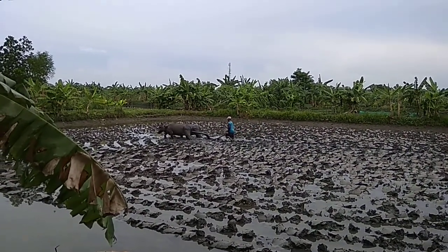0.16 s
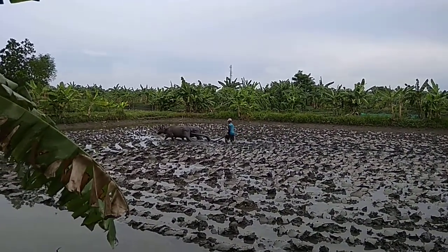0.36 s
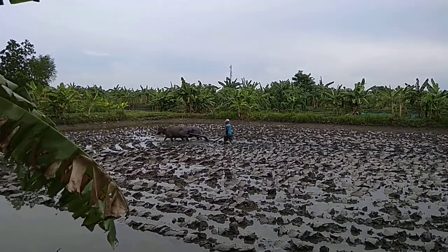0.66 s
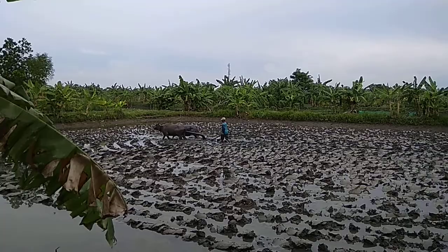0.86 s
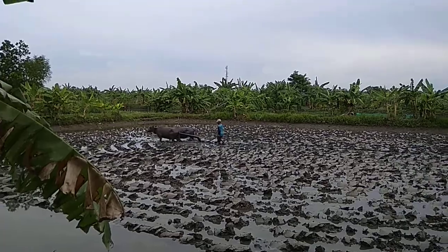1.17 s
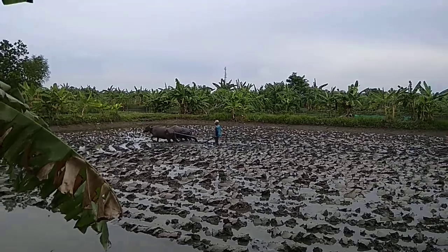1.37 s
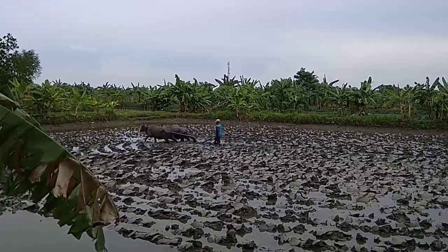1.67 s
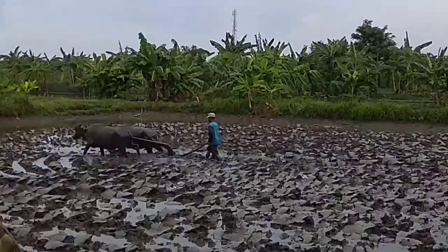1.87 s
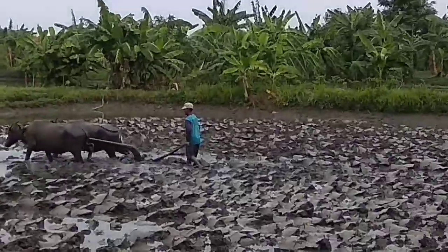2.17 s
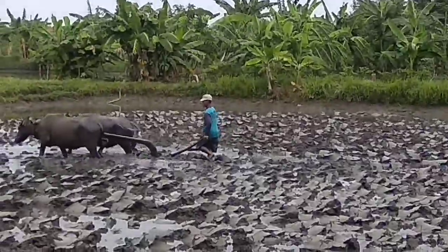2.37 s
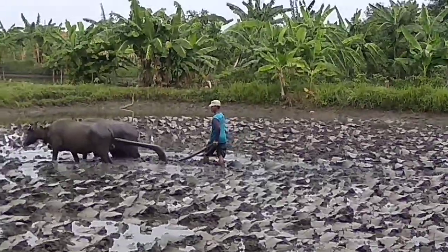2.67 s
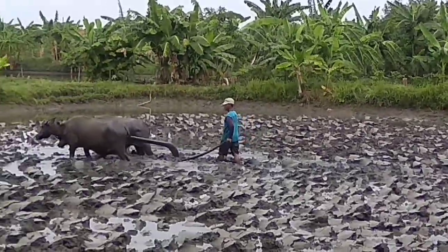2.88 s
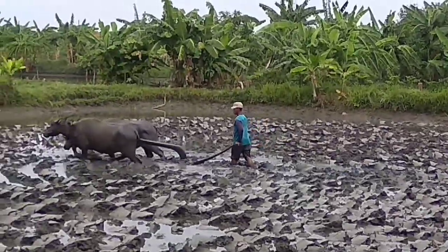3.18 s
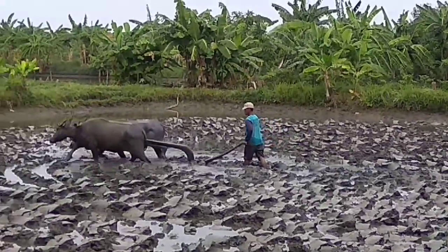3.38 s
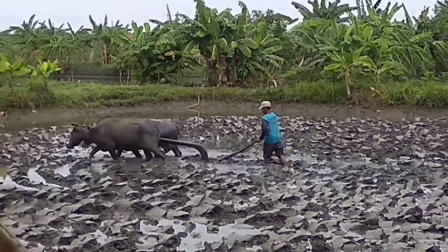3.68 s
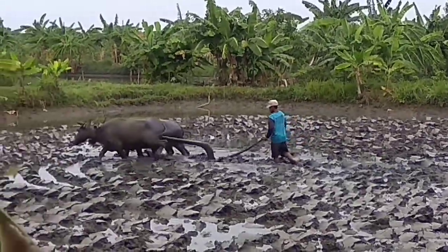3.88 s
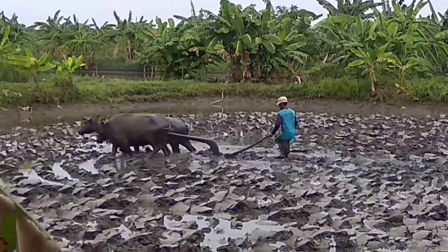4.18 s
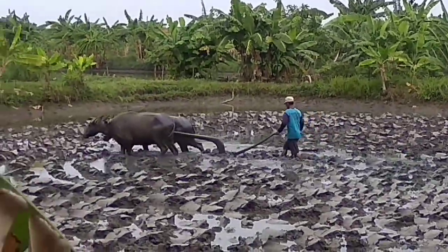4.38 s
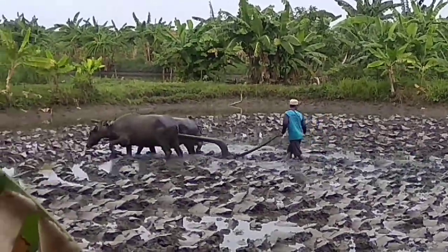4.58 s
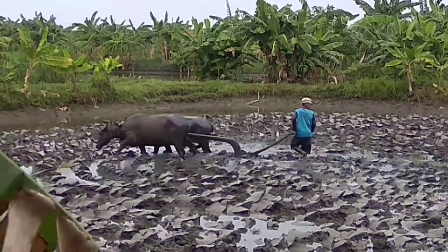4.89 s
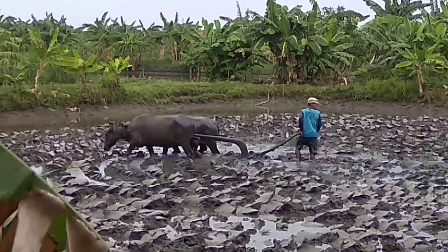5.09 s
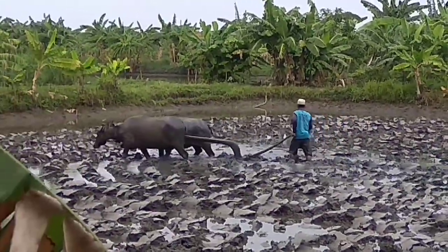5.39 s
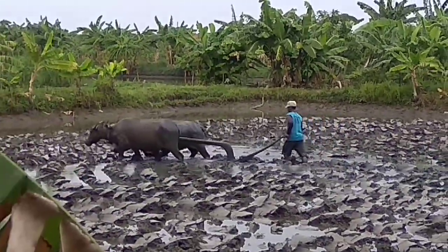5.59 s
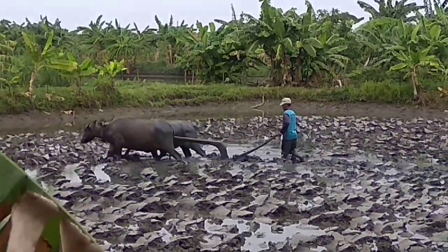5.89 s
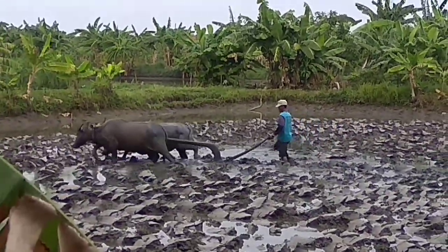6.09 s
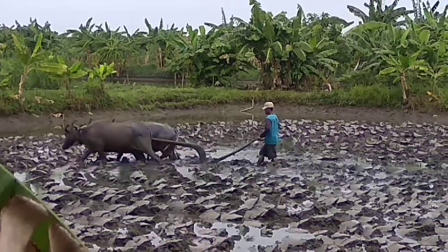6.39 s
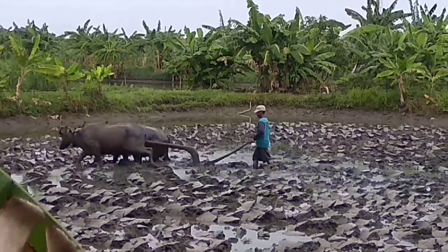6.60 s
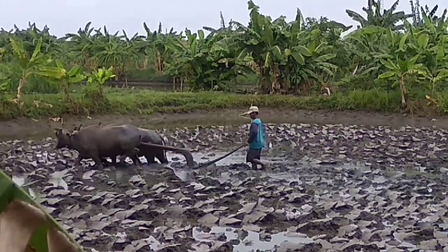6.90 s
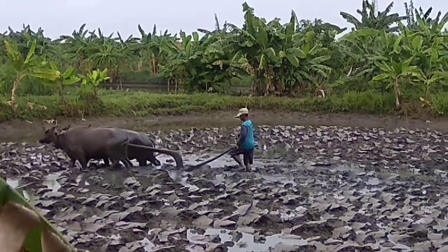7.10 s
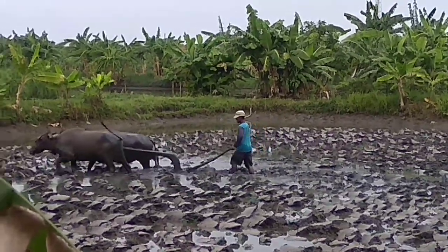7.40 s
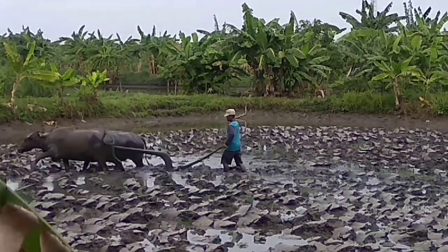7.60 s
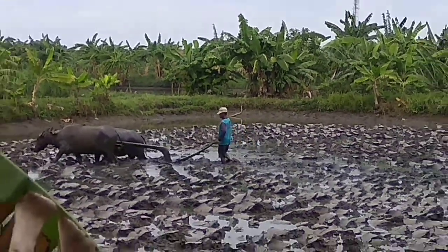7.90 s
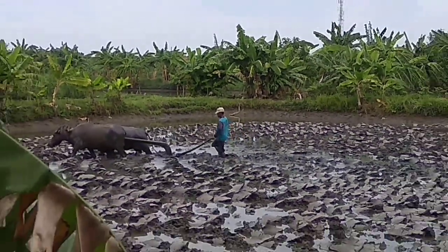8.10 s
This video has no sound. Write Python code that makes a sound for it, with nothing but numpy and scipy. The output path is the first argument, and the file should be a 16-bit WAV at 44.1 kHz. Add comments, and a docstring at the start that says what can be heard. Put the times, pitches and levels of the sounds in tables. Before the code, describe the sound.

Open countryside heard through a phone, slightly muffled, with the low sound leaning left. From 0 s a small single-cylinder motorbike putters, revs rising, over road rumble, dry rattle, high hiss and faint insects; a soft high rustle comes at 0.3 s. At 0.5 s a nearer bike enters with slow separate thumps that quicken into a throaty, barking buzz by 1.2 s. The first bike's pitch drops sharply at 2.1 to 2.5 s in a gear change, then climbs again. The near exhaust is strongest around 2.5 s, with valve ticks and a short echo. From 3 to 6 s its pitch keeps rising while everything recedes. At about 6.2 s revs fall and rattle and hiss collapse. From 6.5 to 8.2 s only dull, distant puttering remains, with small scattered rustles, clearest near 7.4 s and at the very end, and thin insect hiss.

```python
"""Two single-cylinder motorbikes pull away along a country road to the left of a phone, change gear and fade.
One bike is heard from the start, with road rattle, hiss and faint insects; the nearer one joins at half a second.
Each firing thumps, rings and barks through the exhaust pipe, with an echo and valve ticks on top.
After about six seconds the revs fall; the noise-made treble also fades, leaving a few short rustles and thin
insect hiss."""
import sys
import numpy as np
from scipy import signal
from scipy.fft import rfft, irfft, next_fast_len
from scipy.io import wavfile
from scipy.ndimage import uniform_filter1d

SR = 44100
rng = np.random.default_rng(int(sys.argv[2]) if len(sys.argv) > 2 else 0)


def output_pcm(signal):
    """Save a mono or channel-first signal as 16-bit PCM at the path in sys.argv[1].

    Samples are clipped to [-1, 1] before scaling.
    """
    pcm = np.clip(np.atleast_2d(signal).T, -1, 1) * 32767
    wavfile.write(sys.argv[1], SR, np.round(pcm).astype(np.int16))


N = 363808  # length in samples


def undb(db):
    """Turns a level in dB into a plain gain."""
    return 10 ** (np.asarray(db) / 20)


def unit(x):
    """Scales a sound to an average (rms) level of 1."""
    return x / np.sqrt(np.mean(x ** 2))


def curves(table):
    """Joins the rows of a table with straight lines: every column after the time, one value a sample."""
    s, *columns = np.transpose(table)
    return [np.interp(np.arange(N) / SR, s, c) for c in columns]


def on_log(table, hz):
    """Reads a (pitch_hz, value) table with pitch spaced in octaves, as the ear hears it."""
    pitch_hz, values = np.transpose(table)
    return np.interp(np.log(np.maximum(hz, 1)), np.log(pitch_hz), values)


def shape(x, db_of_hz):
    """Colours a sound by a gain in dB for each frequency."""
    size = next_fast_len(N + SR // 10)
    gain = undb(db_of_hz(np.fft.rfftfreq(size, 1 / SR)))
    return irfft(rfft(x, size) * gain, size)[..., :N]


def resonance(x, hz, width):
    """Lets one pitch ring through, like a hollow body: a two-pole band-pass with gain 1 at its centre."""
    return signal.lfilter(*signal.iirpeak(hz, hz / width, fs=SR), x)


def walk(rate):
    """Wanders smoothly between random levels, rate of them a second; spread near 1."""
    k = int(SR / rate)
    steps = np.repeat(rng.standard_normal(N // k + 1), k)
    return 1.3 * uniform_filter1d(uniform_filter1d(steps, k), k)[:N]


def noise(spectrum, alike, flicker_db, flicker_rate):
    """Noise in half-octave bands, each flickering alone; alike = how much left and right share."""
    out = 0
    low_hz, high_hz = spectrum[0][0], spectrum[-1][0]
    for hz in low_hz * 2 ** np.arange(0, np.log2(high_hz / low_hz), .5):
        mid, side = (resonance(rng.standard_normal(N), hz, hz / 2) for _ in range(2))
        mid_share, side_share = np.sqrt((1 + np.array([alike, -alike])) / (2 * hz))
        band = mid_share * mid + side_share * side * np.array([[1], [-1]])
        out = out + undb(flicker_db * walk(flicker_rate)) * band
    # the bands are equally strong per octave; the second term makes them equal per Hz
    return unit(shape(out, lambda hz: on_log(spectrum, hz) + 10 * np.log10(np.maximum(hz, 1))))


JITTER, SCATTER_DB = .007, 1.0  # random spread of firing time (share of a cycle) and strength
WANDER_TURNS, WANDER_DB = .025, 1.5  # slow drift of firing time (cycles) and strength, times each bike's wander
DRIFT_DB, DRIFT_SHARE = 2.0, .02  # each resonance drifts alone in strength and pitch
FAINT_DB, FAINT_SCATTER = -46, 0.3  # below this level moving air makes firings more uneven, by this share per dB
RING_T60_S = 0.085  # time for the long ring to fall by 60 dB
OVERRUN_SAG, OVERRUN_FALL_PER_S2 = 0.24, 30  # the ring sags by this share when the firing rate falls this fast
PUMP_DB_PER_OCTAVE = 17.5  # piston pumping grows with revs
CYCLE_DB, CYCLE_DB_PER_OCTAVE = -15.5, 22  # tone at the firing rate against the pumping; extra growth with revs
PARTNER_DB = -8.5  # lower partner of the bark, against the bark


def bike(rate, table, pipe, long_ring, start, pump_db, pump_turn, wander):
    """Each firing rings the pipe, which sounds higher as the gas heats with revs; the piston pumps twice a cycle."""
    hz, = curves(rate)
    octaves = np.log2(hz / 35)
    ring_db, thump_db, bark_db, third_db = curves(table)
    ring_db = ring_db + (wander * WANDER_DB + np.clip(FAINT_DB - ring_db, 0, 5) / 2) * walk(6.3)
    bark_db = ring_db + bark_db
    levels_db = ring_db, ring_db + thump_db, bark_db, ring_db + third_db, bark_db + PARTNER_DB

    # with the throttle shut the revs fall and the gas cools
    fall = -uniform_filter1d(np.gradient(hz) * SR, size=SR // 10)
    overrun = np.clip(fall / OVERRUN_FALL_PER_S2, 0, 1) ** 2
    ring_hz = long_ring[0] * (hz / 35) ** long_ring[1] * (1 - OVERRUN_SAG * overrun)

    # the engine fires each time the count of turns passes a whole number
    turns = start + np.cumsum(hz) / SR + wander * WANDER_TURNS * walk(5)
    at = np.flatnonzero(np.diff(np.floor(turns)))
    at = at[at > table[0][0] * SR]
    chance = rng.standard_normal((400, 7))
    t, rise_s = np.arange(6144) / SR, .003
    swell = np.sin(np.pi / 2 * np.minimum(t / rise_s, 1)) ** 2
    drift = [(undb(DRIFT_DB * walk(6)), 1 + DRIFT_SHARE * walk(8)) for _ in levels_db]
    sound = np.zeros(N + len(t))
    for i, (late, shared, *own) in zip(at, chance):
        uneven = 1 + FAINT_SCATTER * np.clip(FAINT_DB - ring_db[i], 0, 6)
        first = max(i + int(JITTER * uneven * late * SR / hz[i]), 0)
        period = int(SR / hz[i])
        modes = [(ring_hz[i], RING_T60_S)] + [(f * (hz[i] / 35) ** rise, t60) for f, t60, rise in pipe]
        for (f, t60), db, mine, (gain, tune) in zip(modes, levels_db, own, drift):
            # all resonances crest together at the top of the pressure rise
            ring = swell * np.cos(2 * np.pi * f * tune[i] * (t - rise_s)) * undb(-60 * t / t60)
            # rings of earlier firings overlap within one cycle; together they make the rms level
            cycle = np.bincount(np.arange(len(t)) % period, ring)
            strength = undb(db[i] + SCATTER_DB * uneven * (shared + mine)) * gain[i]
            sound[first:first + len(t)] += strength / np.std(cycle) * ring

    twice = np.sin(4 * np.pi * (turns + pump_turn))
    once = undb(CYCLE_DB + CYCLE_DB_PER_OCTAVE * octaves) * np.sin(2 * np.pi * turns)
    pump_gain = np.sqrt(2) * undb(ring_db + pump_db + PUMP_DB_PER_OCTAVE * octaves)
    pumping = pump_gain * (twice + once) * (np.arange(N) > at[0])
    return sound[:N] + pumping, at


# how fast the far engine fires: (start_s, firings_per_s)
FAR_FIRING_RATE = [(0.0, 34.8), (1.0, 38.77), (2.0, 41.83), (2.15, 38.04), (2.5, 28.35), (2.8, 28.07),
                   (4.5, 33.96), (5.6, 36.57), (6.0, 35.75), (6.45, 30.06), (6.8, 29.14), (7.3, 30.41),
                   (8.25, 31.9)]
# loudness of its exhaust: (start_s, ring level_db, thump_db, bark_db and rasp_db, these three against the ring)
FAR_LEVELS = [(0, -27.5, -27, -27, -31), (.35, -33, -25, -25, -25), (.8, -37.5, -3.5, -11.5, -33),
              (1.6, -60, 20, 13, -18), (2.4, -39.5, -1, -4, -9), (3.1, -37, -14, 4, -4),
              (3.8, -40.5, 2.5, 2.5, -8), (4.6, -43.5, 3, -6.5, -19), (5.6, -44.5, 2, -27, -16),
              (6.6, -58, 4, -31, -10), (7.4, -52.5, -0.5, -9.5, -30), (8.25, -71, -6, -19, -31)]
# its pipe, in rows thump, bark, rasp, lower partner of the bark:
# (pitch_hz at 35 firings per s, fall by 60 dB_s, rise with revs as a power)
FAR_RESONANCES = [(111, 0.026, 0.23), (341, 0.07, 0.26), (585, 0.0016, 0.1), (264, 0.037, 0.5)]
# long ring of its pipe: (pitch_hz at 35 firings per s, rise with revs as a power)
FAR_LONG_RING = (153, 0.056)


def far_bike():
    """The far single-cylinder engine, its firings ringing a pipe with a short thump and a rasp."""
    return bike(FAR_FIRING_RATE, FAR_LEVELS, FAR_RESONANCES, FAR_LONG_RING,
                start=.82, pump_db=-15.5, pump_turn=0.013, wander=0.98)


# loudness of the road's treble: (start_s, rattle_db, bright rattle_db, hiss_db)
ROAD_LEVELS = [(0, -44, -51, -53.5), (.2, -46, -60, -53.5), (.6, -47, -56.5, -53.5), (1.2, -46, -53.5, -49),
               (1.6, -43.5, -51, -50.5), (2.1, -43.5, -53.5, -52), (2.7, -43, -55.5, -47.5),
               (3.1, -43, -64, -48.5), (3.9, -45, -64, -49.5), (4.5, -46.5, -62, -52.5),
               (5.3, -48, -68.5, -57.5), (6.2, -53, -62, -62.5), (6.35, -62.5, -82, -63),
               (6.5, -80, -80, -61), (6.75, -85, -79, -71.5), (6.95, -87, -89, -72.5),
               (7.3, -94, -102, -76.5), (7.5, -92, -100, -84.5), (8.25, -92, -100, -88)]
# loudness of the low rumble: (start_s, level_db)
RUMBLE_LEVEL = [(0, -41), (.6, -41), (1.2, -38), (1.9, -38.5), (3.1, -38.5), (3.9, -38.5), (4.5, -40.5),
                (6.2, -46.5), (6.5, -50), (6.95, -48.5), (7.5, -49.5), (8.25, -50)]
# loudness of the upper rumble: (start_s, level_db, depth of its lumps_db, where below 0 means none)
UPPER_RUMBLE_LEVEL = [(0, -52, -0.5), (.6, -54.5, 21.5), (1.5, -42.5, -6), (3.1, -47.5, 7), (4.5, -45, -13),
                      (6.2, -54, 13), (6.5, -59, 7), (7.1, -59.5, 3), (7.6, -68, 5), (8.0, -75, 3.5),
                      (8.25, -57.5, 5.5)]
# colours of the noises, relative: (pitch_hz, level_db per Hz)
RUMBLE_COLOUR = [(20, -21), (40, -7), (70, -3), (110, -6), (200, -7), (370, -7), (450, -16), (560, -34),
                 (700, -60)]
UPPER_RUMBLE_COLOUR = [(380, -20), (480, 3.5), (620, -2), (780, -9.5), (900, -25), (1300, -70)]
RATTLE_COLOUR = [(420, -27), (620, -0.5), (900, -3.5), (1300, -7.5), (1700, -6), (2500, -13), (4000, -18),
                 (5500, -25.5), (7000, -54)]
HISS_COLOUR = [(3000, -5), (4500, 0), (5800, -3.5), (7500, 0), (10300, 1.5), (12500, -0.5), (14500, -6),
               (15700, -26)]


def road(at):
    """Low rumble of tyres and echoes, the rattle of running gear, and a high hiss, all made of noise."""
    rattle_db, bright_db, hiss_db = curves(ROAD_LEVELS)
    upper_db, lump_db = curves(UPPER_RUMBLE_LEVEL)
    low_db, = curves(RUMBLE_LEVEL)
    low_db = low_db + np.clip(FAINT_DB - low_db, 0, 3) * walk(9)  # lumpier when faint
    rumble = undb(low_db) * noise(RUMBLE_COLOUR, .85, flicker_db=2.5, flicker_rate=11)
    upper = noise(UPPER_RUMBLE_COLOUR, 0.19, flicker_db=0.0, flicker_rate=16)
    upper = undb(upper_db + np.clip(lump_db, 0, 6) * walk(14)) * upper

    # the rattle swells by 1.8 dB once a cycle, as the valve shuts
    cycle = np.interp(np.arange(N), at, np.arange(len(at)))
    throb = undb(-1.8 * np.cos(2 * np.pi * cycle))
    rattle = throb * noise(RATTLE_COLOUR, 0, flicker_db=1.5, flicker_rate=18)
    bright = rng.standard_normal((2, N))
    for _ in range(3):
        bright = resonance(bright, hz=2550, width=2100)
    bright = undb(bright_db + 2.0 * walk(22.12)) * unit(bright)
    hiss = undb(.9 * walk(35) + .3 * walk(5)) * noise(HISS_COLOUR, 0, flicker_db=1.3, flicker_rate=22)
    return rumble + upper + undb(rattle_db) * rattle + bright + undb(hiss_db) * hiss


# insect-like bands: (pitch_hz, width_hz of each filter pass, level_db at the start, fade_db per s)
INSECT_BANDS = [(10600, 920, -61.5, 2.5), (6660, 1400, -56.5, 9), (13200, 2500, -78, 2.5)]


def insects():
    """Narrow high bands of hiss that waver and fade, made by filtering noise twice."""
    out = 0
    for hz, width, db, fade_db in INSECT_BANDS:
        band = resonance(resonance(rng.standard_normal((2, N)), hz, width), hz, width)
        out = out + unit(band) * undb(db - fade_db * np.arange(N) / SR + 3 * walk(14))
    return out


# each part of a rustle, levels before its swell; rows at nearly one time sound as one burst:
# (start_s, length_s, body level_db, body pitch_hz, width_hz of each filter pass, treble level_db,
# left minus right_db)
RUSTLE_PARTS = [(0.291, 0.15, -52.5, 6500, 1200, -51, -2), (2.687, .05, -53, 4400, 1200, -62, 0),
                (6.302, 0.04, -47, 631, 60, -75, 8), (6.377, 0.045, -62, 1390, 700, -52, -1),
                (6.505, 0.088, -67.5, 1890, 600, -64, -4), (6.544, 0.043, -63, 1210, 400, -72, 4),
                (6.763, 0.054, -75, 690, 200, -60, -10), (6.768, 0.38, -75, 5900, 2200, -93, 14),
                (6.872, 0.044, -65.5, 1230, 250, -56, -3), (7.035, 0.053, -68, 1090, 300, -85, 4),
                (7.065, 0.078, -77.5, 1970, 500, -64.5, -11), (7.06, .1, -70, 5800, 1200, -90, 8),
                (7.23, 0.08, -81, 1250, 150, -64, -7), (7.363, 0.04, -57.5, 1220, 350, -58.5, 2.5),
                (7.363, 0.039, -60, 1760, 400, -90, 7), (7.365, 0.047, -65.5, 4260, 1000, -90, 0),
                (7.348, 0.035, -67, 870, 80, -90, 12), (7.36, .04, -74, 3100, 300, -90, 1),
                (7.41, 0.049, -75, 1500, 900, -67, 0), (7.543, 0.044, -76, 1290, 400, -63, -4),
                (7.538, .05, -78, 3200, 600, -90, -7), (7.618, .06, -85, 1290, 500, -67, -3),
                (7.797, .04, -84, 2820, 500, -87, 1), (7.78, .03, -78, 1040, 200, -90, 6),
                (7.792, 0.056, -78, 790, 100, -60.5, -3), (7.977, 0.051, -70, 1230, 300, -60, 1),
                (8.045, 0.064, -53, 550, 200, -90, 4), (8.115, 0.036, -60, 680, 200, -90, 4)]
# colour of the treble they share, relative: (pitch_hz, level_db per Hz)
RUSTLE_TREBLE_COLOUR = [(2500, -14), (4000, -3), (5800, -15), (7500, -8), (10300, 7), (12500, -5),
                        (14500, -2), (15700, -18)]


def rustles():
    """Short bursts of noise with a sharp start: each part has a body of its own pitch and a common treble."""
    high = noise(RUSTLE_TREBLE_COLOUR, 0, flicker_db=3.5, flicker_rate=16)
    flicker = undb(2.0 * walk(50))
    out, t = np.zeros((2, N + SR)), np.arange(SR) / SR
    soft = 1 - np.exp(-(t / .02) ** 2)  # the treble swells more slowly than the body
    for s, length_s, db, hz, width, treble_db, pan_db in RUSTLE_PARTS:
        body = rng.standard_normal((2, len(t)))
        for _ in range(3):
            body = resonance(body, hz, width)
        swell = (1 - np.exp(-t / 0.004)) * np.exp(-(t / max(length_s, .01)) ** 1.2)
        first = int(s * SR)
        treble = soft * high[:, first // 2:first // 2 + len(t)]
        mix = undb(db) * unit(body) + undb(treble_db) * treble
        pan = undb(np.array([[pan_db], [-pan_db]]) / 2)
        out[:, first:first + len(t)] += swell * pan * mix
    return out[:, :N] * flicker


# how fast the near engine fires: (start_s, firings_per_s)
NEAR_FIRING_RATE = [(.5, 14.47), (.62, 16.93), (1.1, 31.7), (1.25, 32.9), (1.45, 31.78), (1.7, 34.28),
                    (2.1, 34.79), (2.36, 32.82), (2.55, 33.33), (3.4, 37.05), (4.5, 41.85), (6.1, 48.12),
                    (6.25, 48.0), (6.45, 41.6), (6.8, 33.1), (7.03, 37.49), (7.27, 35.08), (8.25, 36.3)]
# loudness of its exhaust: (start_s, ring level_db, thump_db, bark_db and boom_db, these three against the ring)
NEAR_LEVELS = [(.5, -33, -21, -10.5, -4.5), (.8, -33.5, -6, -6, -11.5), (1.3, -32, -9, -4.5, -8.5),
               (1.42, -36.5, -8, 1, -1), (1.52, -30.5, -20, -3.5, -5.5), (1.9, -32.5, -18, -2, -1),
               (2.1, -34, -5, 1, -3), (2.35, -34, -5, 2, -5), (2.47, -27, -27, -3.5, -20),
               (2.8, -29.5, -17, -4.5, -17), (3.0, -35.5, -7, 2, -1), (3.5, -34, -5, 0.5, -25),
               (4.1, -37.5, -5, -1.5, 4), (4.5, -38, 2, 1.5, -22), (5.1, -40, -11, -3.5, -6),
               (6.2, -42.5, -4, -7.5, -16), (6.33, -47.5, 9.5, -12, -11), (6.82, -49.5, 11.5, -36, -26),
               (6.9, -48.5, 6.5, -13, -21), (7.1, -54.5, -11.5, -6, -8), (7.45, -53, 2, -18, -24),
               (7.75, -56, -0.5, -8, -14), (8.25, -57, -14, -4, -8)]
# its pipe, in rows thump, bark, broad boom, lower partner of the bark:
# (pitch_hz at 35 firings per s, fall by 60 dB_s, rise with revs as a power)
NEAR_RESONANCES = [(118.2, 0.21, 0.48), (356, 0.046, 0.14), (204, 0.026, 0.53), (290, 0.12, 0.34)]
# long ring of its pipe: (pitch_hz at 35 firings per s, rise with revs as a power)
NEAR_LONG_RING = (174.8, 0.65)


def near_bike():
    """The near single-cylinder engine, its firings ringing a pipe with a long thump and a broad boom."""
    return bike(NEAR_FIRING_RATE, NEAR_LEVELS, NEAR_RESONANCES, NEAR_LONG_RING,
                start=0.2135, pump_db=-4.5, pump_turn=0.0079, wander=0.43)


TICK_DB, TICK_DB_PER_OCTAVE = 4.5, 10.5  # ticks against the rattle at 35 firings per s; growth with revs


def valves(at):
    """A valve snaps shut part way through each cycle: a short ring of uneven pitch and size, later on the right."""
    octaves = np.log2(curves(NEAR_FIRING_RATE)[0] / 35)
    db = curves(ROAD_LEVELS)[0] + TICK_DB + TICK_DB_PER_OCTAVE * octaves
    t = np.arange(512) / SR
    fade = np.exp(-t / .0012)
    out = np.zeros((2, N + 2048))
    for i, gap, (pitch, size) in zip(at, np.diff(at), rng.standard_normal((400, 2))):
        low = np.sin(2 * np.pi * 1850 * np.exp(.14 * pitch) * t) * (1 - np.exp(-t / .0004))
        high = 0.51 * np.sin(2 * np.pi * 2450 * np.exp(-.08 * pitch) * t)
        tick = (low + high) * fade
        for k, lag in enumerate((0, 6)):  # lag in samples, left and right
            first = i + int(.5 * gap) + lag
            out[k, first:first + len(t)] += undb(db[i] + 3.5 * size) * tick
    return out[:, :N]


def echo(exhaust):
    """The trees send the exhaust back about 12 ms late and 13 dB weaker, with a slowly drifting delay."""
    lag_s = np.array([[.0115], [.0121]]) + .0008 * walk(1.5)  # left and right
    late = [np.interp(np.arange(N) - lag, np.arange(N), exhaust) for lag in lag_s * SR]
    return undb(-13) * np.array(late)


# how the two sides differ, rustles and insects apart: (pitch_hz, left minus right_db)
BALANCE = [(60, 4.0), (110, 4.0), (200, 4.5), (380, 4.0), (700, 4.5), (1290, 5.5), (2380, 4.0), (4400, 2.0),
           (8120, -0.5), (15000, -2.5)]


def scene():
    """Both exhausts reach the two microphone ports alike; the left port hears the bass louder."""
    far, _ = far_bike()
    near, firings = near_bike()
    # the silencers weaken everything above the rasp
    exhaust = signal.sosfilt(signal.butter(4, 620.0, fs=SR, output="sos"), near + far)
    sound = exhaust + echo(exhaust) + road(firings) + valves(firings)
    lean = [shape(sound[k], lambda hz: sign * on_log(BALANCE, hz) / 2) for k, sign in enumerate((1, -1))]
    return np.array(lean) + insects() + rustles()


DIP_SPACING_HZ, DIP_DB = 125.46, 13.5  # the dips are deepest around 850 Hz
TOP_HZ = 15700


def record(dry):
    """The phone drops the deepest bass, has evenly spaced dips in the low mids, and cuts the top."""
    def dips(hz):
        """Gain in dB at each frequency."""
        comb = np.sin(np.pi * hz / DIP_SPACING_HZ) ** 6
        return -DIP_DB * comb * np.exp(-((hz - 850) / 330) ** 2)

    dry = signal.sosfilt(signal.butter(2, 40.0, "high", fs=SR, output="sos"), shape(dry, dips))
    return signal.sosfilt(signal.ellip(10, .2, 80, TOP_HZ, fs=SR, output="sos"), dry)


dry = scene()
out = record(dry)
output_pcm(out)
```